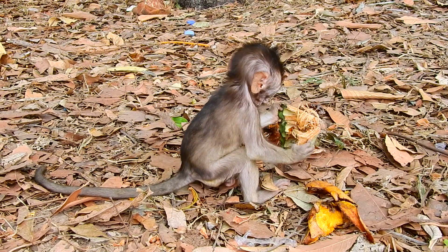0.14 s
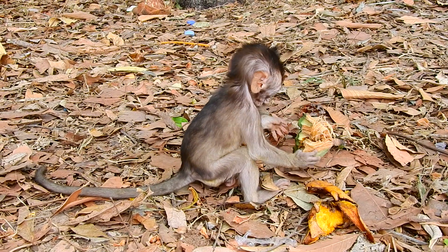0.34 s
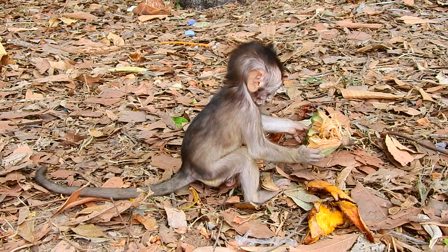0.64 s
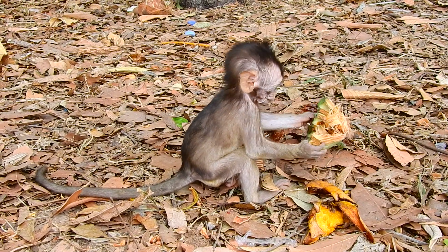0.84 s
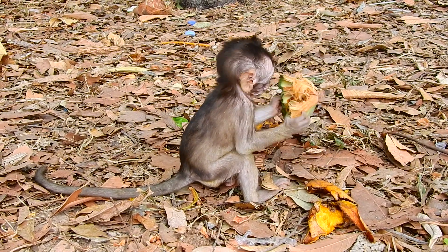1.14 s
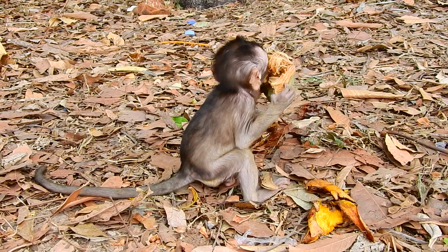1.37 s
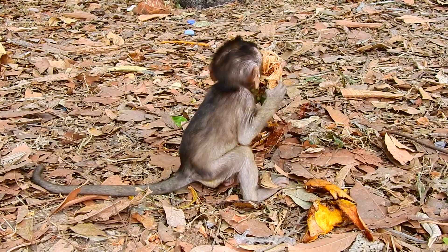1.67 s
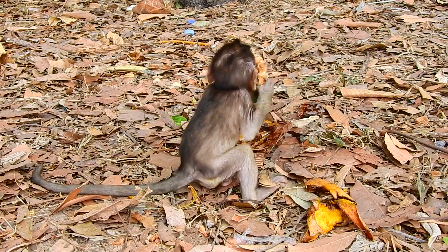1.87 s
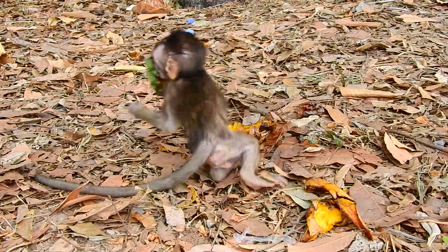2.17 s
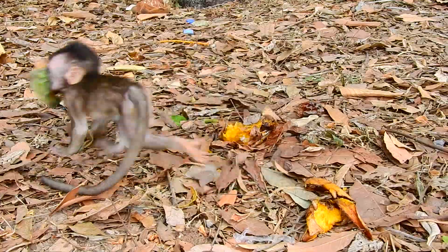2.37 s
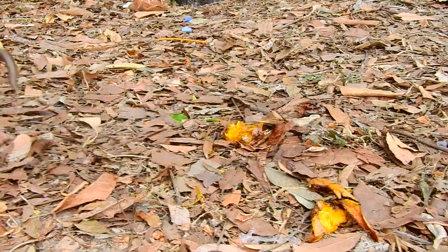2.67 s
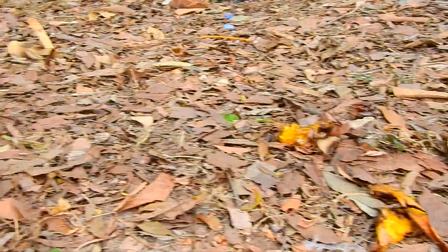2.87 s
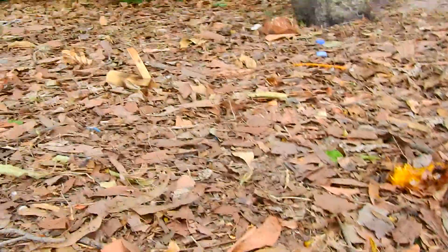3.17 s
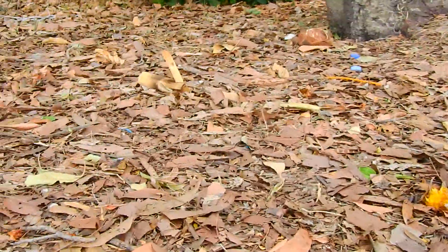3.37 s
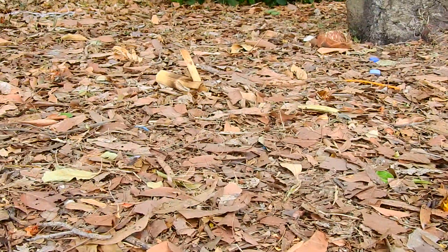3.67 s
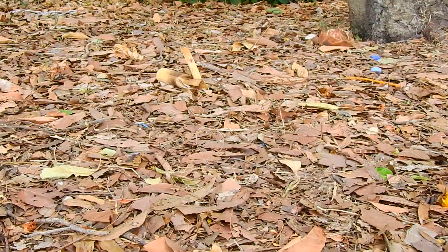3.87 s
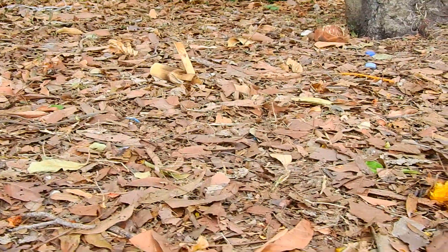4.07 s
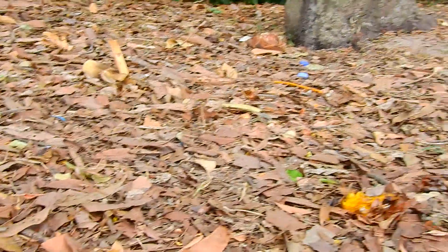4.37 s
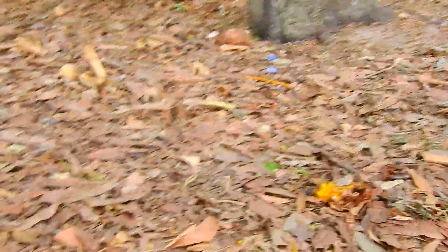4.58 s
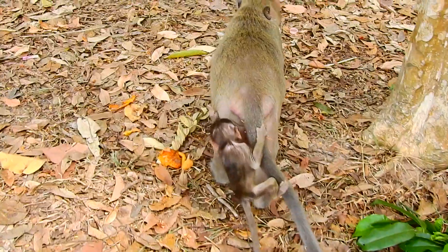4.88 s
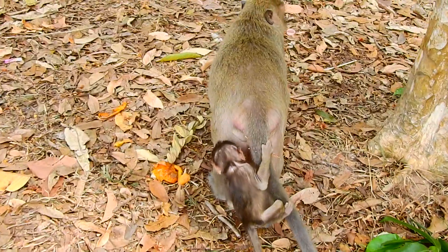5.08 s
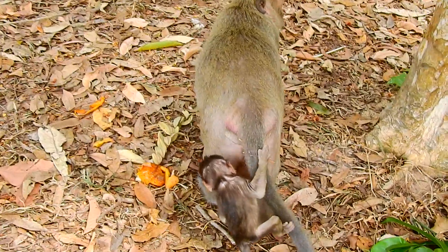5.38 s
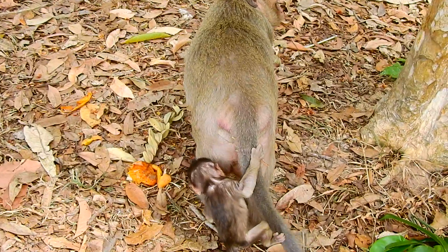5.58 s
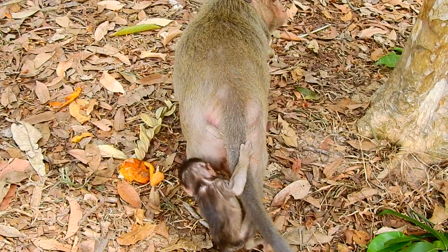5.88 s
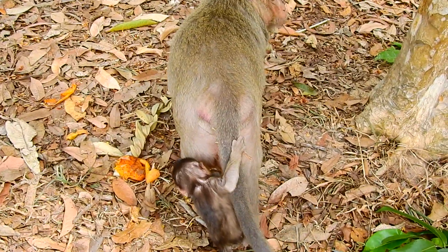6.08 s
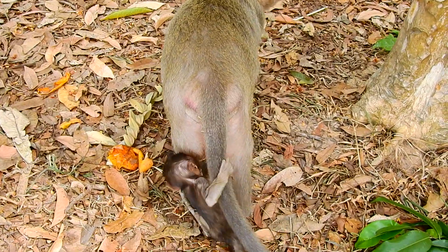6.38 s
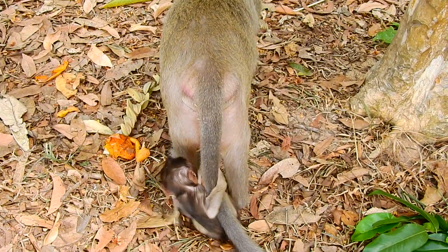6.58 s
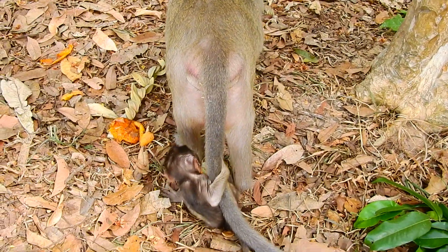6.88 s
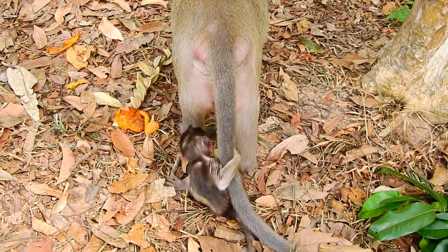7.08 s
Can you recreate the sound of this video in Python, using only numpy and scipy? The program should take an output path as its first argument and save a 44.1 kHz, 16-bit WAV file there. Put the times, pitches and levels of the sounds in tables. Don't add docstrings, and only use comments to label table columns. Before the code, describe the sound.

Outdoor traffic rumble with distant puttering motorbikes, one short echoing two-tone beep, little paws snapping dry leaves, then half a second of silence before resuming.

```python
import sys
import numpy as np
from scipy import signal
from scipy.fft import rfft, irfft, next_fast_len
from scipy.io import wavfile
from scipy.ndimage import uniform_filter1d, map_coordinates

SR = 44100
rng = np.random.default_rng(int(sys.argv[2]) if len(sys.argv) > 2 else 0)


def decibels_to_gain(level_db):
    exponent = np.asarray(level_db, float) / 20
    return 10 ** exponent


def output_pcm(signal):
    pcm = np.clip(np.atleast_2d(signal).T, -1, 1) * 32767
    wavfile.write(sys.argv[1], SR, np.round(pcm).astype(np.int16))


N = 318831

# (time [s], firing rate [1/s], level [dB])
BIKE = [
    (0.0, 37.3, -21.5),
    (.25, 34.3, -27.5),
    (1.0, 33.1, -24.5),
    (1.15, 35.7, -26),
    (1.35, 36.3, -30),
    (1.85, 33.5, -30),
    (2.8, 33.4, -25),
    (3.4, 35.7, -22.5),
    (3.6, 37.2, -25.5),
]
NEARING = [
    (1.2, 26.92, -26),
    (1.5, 28.09, -27.5),
    (1.75, 27.97, -24.5),
    (2.4, 29.29, -29.5),
    (3.0, 30.16, -26.5),
    (3.7, 30.64, -25),
    (3.95, 30.31, -28.5),
    (4.14, 27.56, -24),
    (4.3, 25.54, -26.5),
]
LATE = [
    (4.75, 33.99, -25.5),
    (5.2, 35.16, -32),
    (5.5, 32.73, -32.5),
    (5.85, 34.27, -33),
    (6.2, 34.34, -32.5),
    (6.7, 31.7, -29.5),
    (7.0, 35.21, -38),
    (7.23, 36.24, -29.5),
]
IDLER = [
    (4.75, 28.19, -31),
    (5.0, 29.75, -32.5),
    (5.4, 27.95, -30),
    (5.9, 27.91, -32.5),
    (6.27, 28.25, -32),
    (7.0, 28.16, -32),
    (7.23, 27.83, -24),
]
# (frequency [Hz], width [Hz], level [dB])
PIPE = [(59.4, 25, -7.5), (109.7, 50.3, 0), (137.7, 47.5, 1.5), (190, 39.4, -2.5)]
# (frequency [Hz], width [Hz], level [dB])
BARK = [(300, 84, 1.5), (461, 165, -3.5), (634, 257, -7)]
BOOM_HZ, BOOM_WIDTH_HZ = 61, 3

# (time [s], stream level [dB], nearness over its farthest [dB])
ROAD = [(0.0, -20.5, -0.6), (.45, -21.5, -0.7), (.8, -21.5, -0.6), (1.15, -28.5, 0.3), (1.5, -22, 3.3),
        (1.9, -21.5, 3), (2.2, -22.5, 3.5), (2.56, -25.5, 5.5), (3.1, -29.5, 5.5), (3.8, -30, 5.5),
        (4.1, -22, 3), (4.8, -22.5, 0.3), (5.45, -22, -1.9), (5.9, -24, 0.7), (6.3, -22, -1.5),
        (6.95, -25, -0.2), (7.23, -20.5, -1.8)]
# (frequency [Hz], density [dB per Hz])
RUMBLE = [(13, -68.5), (22, -42), (32, -28.5), (48, -14), (96, 0.5), (146, -1), (205, -8.5), (225, -13),
          (260, -11), (340, -24.5), (570, -120)]
ROAR = [(120, -22), (200, 1), (226, -13), (248, -7), (495, -13.5), (635, -15.5), (1100, -22.5), (1430, -50),
        (2420, -120)]
TYRES = [(470, -27), (800, -5.5), (1300, -0.5), (2120, -5), (2450, -4), (3050, -5.5), (4600, -9),
         (5980, -34), (10100, -120)]
HISS = [(2500, -37.5), (4000, -12.5), (5200, -4), (6400, 0.5), (7300, -5.5), (8400, -17.5), (10000, -27),
        (12000, -41), (15800, -49.5)]
ROAR_DB, TYRE_DB, HISS_DB = -33, -37.5, -36
ROAR_GROWS, TYRE_GROWS = 0.6, 0.42
PULL_S, PULL_LENGTH_S, PULL_DB = 3.59, 0.52, 6

# (frequency [Hz], left-right likeness [0-1])
ALIKE = [(60, 0.97), (250, 0.98), (600, 0.91), (1200, 0.86), (2500, 0.76), (4000, 0.75), (6000, 0.22),
         (12000, .1)]
# (frequency [Hz], left over right [dB])
LEFT = [(60, 1.5), (100, 1.5), (180, 1.0), (300, 0.5), (520, 0.5), (900, 0.0), (1540, 1.0), (2650, 1.5),
        (4550, 2.0), (7810, 1.0)]

# (start [s], length [s], level [dB])
HORNS = [
    (1.401, 0.064, -28),
    (1.426, 0.061, -29.5),
]
HORN_HZ = (424, 501.8)
# (frequency [Hz], level [dB])
LOW_BELL = [(424, -23.5), (850, -16), (1270, -4.5), (1700, -8.5), (2120, 0.5), (2540, -6.5), (2970, -6),
            (3400, -17.5), (4240, -18), (4660, -19.5), (5080, -19), (5500, -26.5)]
HIGH_BELL = [(500, -9.5), (1000, -5), (1500, -2.5), (2000, -5.5), (2500, -4.5), (3000, -0.7), (3500, -10.5),
             (4000, -18.5), (5000, -12.5), (5500, -21), (6500, -6.5), (7500, -26)]
BRIGHTEN_S, RASP = 0.007, 0.18
# (delay [s], level [dB])
WALLS = [(.045, -10), (.085, -13.5), (.125, -10.5), (.175, -7.5), (.22, -17.5), (.275, -14), (.36, -21.5)]
# (frequency [Hz], time to fall 60 dB [s])
TREES = [(100, 0.31), (1000, 1.5), (3000, 0.7), (8000, .4)]

# (frequency [Hz], density [dB per Hz])
LEAF = [(800, -38), (2000, -14.5), (4500, -10.5), (6400, 1), (8400, -10.5), (11000, -22), (13000, -26.5),
        (15800, -41.5)]
# (time [s], peak level [dB], frequency [Hz], left over right [dB])
SNAPS = [(1.9699, -21, 5250, 1.5), (2.3344, -21, 5750, 1.5), (2.4708, -12, 5600, 1.5),
         (2.8639, -12, 6580, 4.0), (2.8724, -18, 6110, 4.0), (2.9344, -20, 6620, 1.0),
         (2.9806, -18, 6540, 3.0), (3.038, -16, 6510, 3.0), (3.0534, -16, 6340, 1.5),
         (3.3059, -15.5, 4980, 0.0), (3.9579, -20, 6180, 1.5), (5.0863, -25, 5720, 0.5),
         (5.1178, -19, 6460, 0.0), (5.1367, -19, 4900, -0.5), (5.1791, -21, 6470, -1.5),
         (5.2255, -19.5, 5600, -1.5), (5.2364, -22, 6540, 0.0), (5.3303, -19, 4800, 0.0),
         (5.3966, -18, 5300, 1.0), (5.4335, -22, 6280, 2.5), (5.7503, -23, 6080, 4.5),
         (6.108, -22, 6290, 2.0)]
# (time [s], peak level [dB], frequency [Hz], left over right [dB])
TAPS = [
    (3.042, -16.5, 1400, 2.0),
    (3.2963, -13.5, 1900, -0.5),
    (3.7744, -24, 2160, 0.0),
    (5.386, -19, 2200, 0.0),
]
# (time [s], peak level [dB], length [s])
STEPS = [(1.951, -66, .1), (2.38, -53.5, 0.07), (2.474, -45, .012), (2.53, -57, .04), (2.653, -54, 0.022),
         (2.845, -54, .02), (2.872, -43.5, 0.012), (2.935, -48, .012), (2.987, -49.5, .018),
         (3.05, -47, .016), (3.18, -49.5, 0.037), (3.305, -59, .09), (3.67, -53, .15), (4.014, -55, 0.013),
         (4.251, -61.5, 0.027), (4.797, -65, .02), (4.907, -56, 0.033), (5.13, -59.5, .05),
         (5.235, -50.5, .012), (5.405, -62, 0.025), (5.496, -57, .03), (5.673, -54, .035),
         (5.768, -58.5, .05), (6.104, -52, .035), (6.42, -55.5, .06), (6.704, -54, 0.055),
         (6.764, -52, .025), (6.932, -58, .06), (7.22, -63, .03)]
# (from [s], to [s])
SHUFFLE_S = (2.8, 4.3)
GIVE, SHUFFLE_DB, SETTLE_DB = 0.82, -67.5, -70

# (start [s], swell [s], hold [s], stop [s], level [dB])
INSECT = (3.15, .06, .15, .02, -61)
# (from [s], to [s])
GAP = (4.2777, 4.7782)


def unit(x):
    return x / np.sqrt(np.mean(x ** 2) + 1e-20)


def along(points, hz):
    f, v = np.transpose(points)
    return np.interp(np.log(hz + 1), np.log(f + 1), v)


def curves(rows):
    s, *cols = np.transpose(rows)
    return [np.interp(np.arange(N) / SR, s, c) for c in cols]


def wobble(rate):
    knots = rng.standard_normal(int(N * 40 / SR) + 4)
    return map_coordinates(knots, [np.arange(N) * min(rate, 40) / SR])


def filtered(x, response):
    m = next_fast_len(N + SR // 2)
    return irfft(rfft(x, m) * response(np.fft.rfftfreq(m, 1 / SR)), m)[..., :N]


def modes(table):
    def response(f):
        total = 0
        for k, (centre, width, db) in enumerate(table):
            damping = 1j * f * width
            total = total + (-1) ** k * decibels_to_gain(db) * damping / (centre * centre - f * f + damping)
        return total
    return response


def high_pass(f, corner, order):
    return (f / corner) ** order / (1 + (f / corner) ** order)


def rush(spectrum, patchy_db):
    z = signal.stft(rng.standard_normal((2, N)), nperseg=512)[2]
    field = uniform_filter1d(rng.standard_normal(z.shape[1:]), size=6, axis=0)
    field = uniform_filter1d(field, size=12, axis=1)
    pair = signal.istft(z * decibels_to_gain(patchy_db * unit(field)), nperseg=512)[1][:, :N]

    def mid_side(hz):
        turn = np.arccos(np.clip(along(ALIKE, hz), 0, 1)) / 2
        return decibels_to_gain(along(spectrum, hz)) * [np.cos(turn), np.sin(turn)]

    mid, side = filtered(pair, mid_side)
    return unit(np.array([mid + side, mid - side]))


def echoes(x, alike):
    hz, t, z = signal.stft(rng.standard_normal((2, SR)), SR, nperseg=256)
    decay = decibels_to_gain(-60 * t / along(TREES, hz)[:, None])
    tail = signal.istft(z * decay, SR, nperseg=256)[1]
    tail[1] = np.cos(alike) * tail[0] + np.sin(alike) * tail[1]
    return signal.fftconvolve(x[None], tail / np.linalg.norm(tail[0]), axes=1)[:, :N]


def engine(rows, jitter, uneven_db, bark_db, boom_db):
    t = np.arange(N) / SR
    rate, loud_db = curves(rows)
    at = np.flatnonzero(np.diff(np.floor(np.cumsum(rate) / SR)))
    chance = rng.standard_normal((400, 2))[:len(at)]
    at = np.clip(at + (jitter * SR * chance[:, 0]).astype(int), 0, N - 1)
    pulses = -np.bincount(at, decibels_to_gain(uneven_db * chance[:, 1]), N)

    def pipe(f):
        return modes(PIPE)(f) * high_pass(f, 45, 2) / np.sqrt(1 + (f / 222) ** 24)

    thump = unit(filtered(pulses, pipe))
    boom = np.sin(4 * np.pi * np.cumsum(rate) / SR)
    boom = boom / np.hypot(1, (2 * rate - BOOM_HZ) / BOOM_WIDTH_HZ)

    paths = rfft(rng.standard_normal(SR // 10) * decibels_to_gain(-60 * t[:SR // 10] / .1))
    smear = irfft(paths / np.abs(paths))
    scattered = signal.fftconvolve(pulses, smear)[:N]

    def shell(f):
        return modes(BARK)(f) * high_pass(f, 240, 3) / (1 + (f / 900) ** 4)

    bark = unit(filtered(scattered, shell))
    since, left = t - rows[0][0] + .01, rows[-1][0] - t + .01
    heard = np.clip(np.minimum(since, left) * 10, 0, 1) ** .5
    return heard * decibels_to_gain(loud_db) * (thump + decibels_to_gain(bark_db) * bark + decibels_to_gain(boom_db) * boom)


def traffic():
    dry = engine(BIKE, jitter=0.00018, uneven_db=1.7, bark_db=-11.5, boom_db=-30)
    dry = dry + engine(NEARING, jitter=0.0001, uneven_db=1.0, bark_db=-8.5, boom_db=-2.5)
    dry = dry + engine(LATE, jitter=0.00052, uneven_db=2.5, bark_db=-14, boom_db=-25)
    dry = dry + engine(IDLER, jitter=0.00053, uneven_db=2.5, bark_db=-8.5, boom_db=-23)
    return dry + decibels_to_gain(-7.5) * echoes(dry, alike=0.14)


def road():
    rumble_db, near_db = curves(ROAD)
    pull_db = PULL_DB * np.exp(-((np.arange(N) / SR - PULL_S) / PULL_LENGTH_S) ** 2)
    roar_db = ROAR_DB + ROAR_GROWS * near_db + pull_db
    tyre_db = TYRE_DB + TYRE_GROWS * near_db
    hiss_db = HISS_DB + near_db
    swell = wobble(5)
    rumble = decibels_to_gain(rumble_db - 2 + .7 * wobble(6)) * rush(RUMBLE, patchy_db=0.95)
    roar = decibels_to_gain(roar_db - 1.5 + 1.1 * swell) * rush(ROAR, patchy_db=1.85)
    tyres = decibels_to_gain(tyre_db + .6 * swell) * rush(TYRES, patchy_db=1.23)
    hiss = decibels_to_gain(hiss_db + 0.38 * wobble(7.8)) * rush(HISS, patchy_db=1.64)
    return rumble + roar + tyres + hiss


def horn():
    t, dry = np.arange(N) / SR, np.zeros(N)
    air = wobble(35)
    for hz, (s, length, db), bell in zip(HORN_HZ, HORNS, (LOW_BELL, HIGH_BELL)):
        press = np.clip(np.minimum((t - s) / 0.0043, (s + length - t) / 0.016 + 1), 0, 1)
        on = press > 0
        for k in range(1, 16):
            flutter = decibels_to_gain(4.3 * np.roll(air, k * 3000)[on])
            late = max(k - 6, 0) * BRIGHTEN_S
            speaks = np.clip((t[on] - s - late) / .02 + 1, 0, 1)
            tone = np.sin(2 * np.pi * k * hz * t[on] + k * k)
            dry[on] += decibels_to_gain(db + along(bell, k * hz)) * press[on] * speaks * flutter * tone
    rattle = unit(filtered(rng.standard_normal(N), lambda f: np.exp(-(f / 250) ** 2)))
    dry = dry * (1 + RASP * rattle)
    walls = np.zeros((2, N))
    for k, (s, db) in enumerate(WALLS):
        side = decibels_to_gain([[(-1) ** k * 3], [0]])
        walls += decibels_to_gain(db) * np.roll(dry, round(s * SR)) * side
    return dry + walls + decibels_to_gain(-1.0) * echoes(dry, alike=.7)


def steps():
    t = np.arange(N) / SR
    power = decibels_to_gain(2 * SHUFFLE_DB) * (t > SHUFFLE_S[0]) * (t < SHUFFLE_S[1])
    power = power + decibels_to_gain(2 * SETTLE_DB) * (t > SHUFFLE_S[1]) + decibels_to_gain(2 * -71)
    for s, db, length in STEPS:
        near = slice(round((s - .5) * SR), round((s + .5) * SR))
        late = (t[near] - s) / length
        power[near] += decibels_to_gain(2 * db) * np.exp(-2 * np.where(late < 0, -late / GIVE, late))
    return np.sqrt(power)


def leaves():
    break_db = np.minimum(3.1 * rng.exponential(size=(2, N)), 12)
    breaks = (rng.random((2, N)) < .06) * decibels_to_gain(break_db)
    crackle = rush([(1, 0)], patchy_db=-0.5) * breaks
    crackle = unit(filtered(crackle, lambda hz: decibels_to_gain(along(LEAF, hz))))
    crackle = decibels_to_gain(17.5) * steps() * crackle

    snaps, t = np.zeros((2, N + SR)), np.arange(SR // 50) / SR
    for s, db, hz, pan_db in SNAPS + TAPS:
        ring = np.sin(2 * np.pi * hz * t) * decibels_to_gain(-60 * t / .0035)
        ring += 0.48 * rng.standard_normal(len(t)) * decibels_to_gain(-60 * t / 0.006)
        ring *= 1 - np.exp(-t / 0.0002)
        sides = decibels_to_gain(db + 8.0 + np.array([[pan_db], [-pan_db]]) / 2)
        snaps[:, round(s * SR):][:, :len(t)] += sides * ring
    return crackle + filtered(snaps[:, :N], lambda hz: high_pass(hz, 1100, 2) / (1 + (hz / 7500) ** 8))


def insect():
    s, swell, hold, stop, db = INSECT
    t = np.arange(N) / SR - s
    wings = np.clip(np.minimum(t / swell, (swell + hold - t) / stop + 1), 0, 1)
    buzz = filtered(rng.standard_normal((2, N)), lambda f: modes([(11750, 450, 0)])(f) ** 2)
    return wings * decibels_to_gain(db + 2.5 * wobble(40)) * unit(buzz)


def scene():
    return traffic() + road() + horn() + leaves() + insect()


def low_pass(x):
    return signal.sosfilt(signal.butter(12, 15770, fs=SR, output="sos"), x)


def record(dry):
    x = filtered(dry, lambda hz: decibels_to_gain(along(LEFT, hz) * np.array([[.5], [-.5]])))
    t = np.arange(N) / SR
    before = np.clip((GAP[0] + .0004 - t) / .0008, 0, 1)
    mix = x * np.maximum(before, t > GAP[1])
    return low_pass(mix)


dry = scene()
out = record(dry)
output_pcm(out)
```